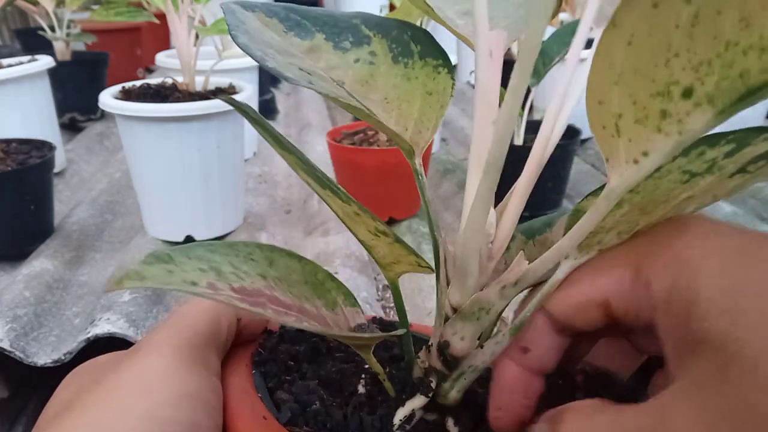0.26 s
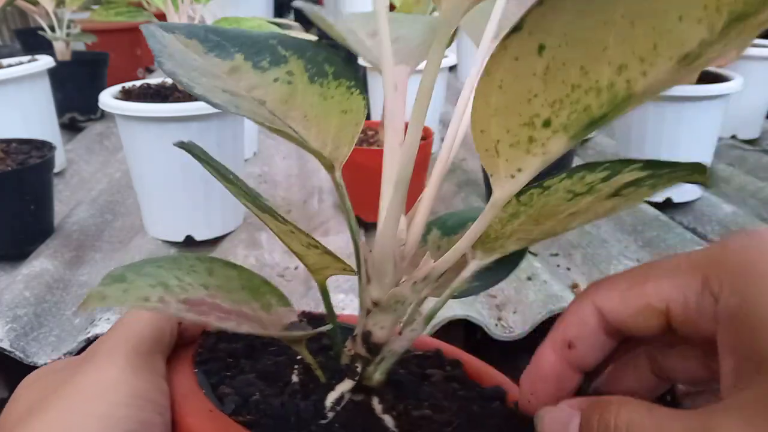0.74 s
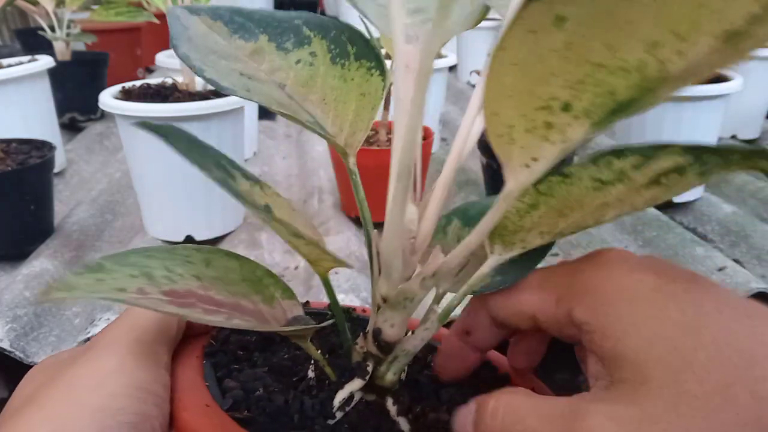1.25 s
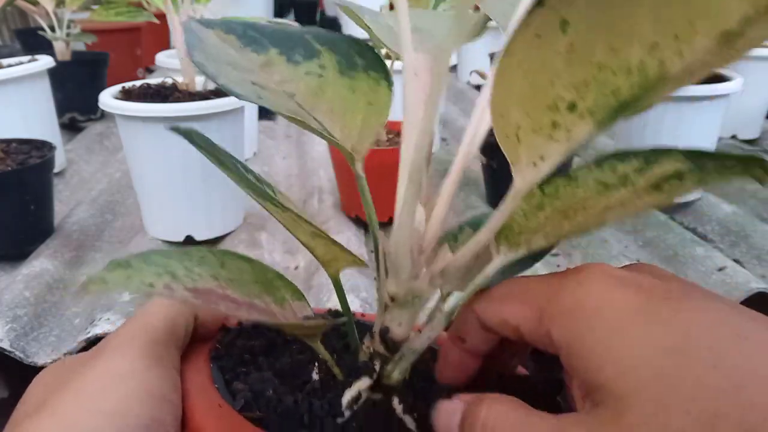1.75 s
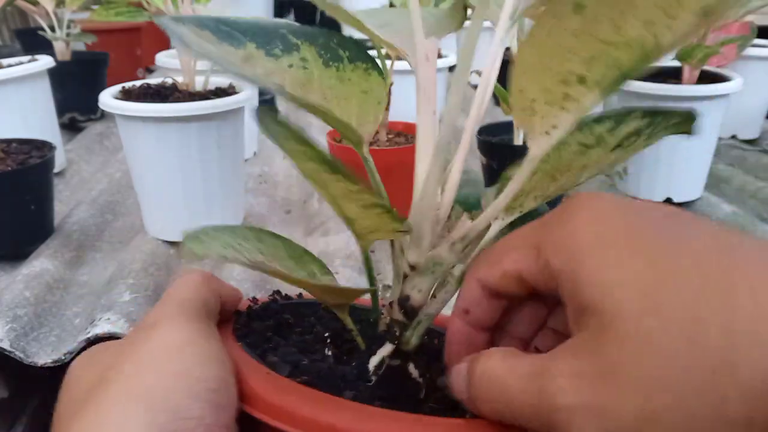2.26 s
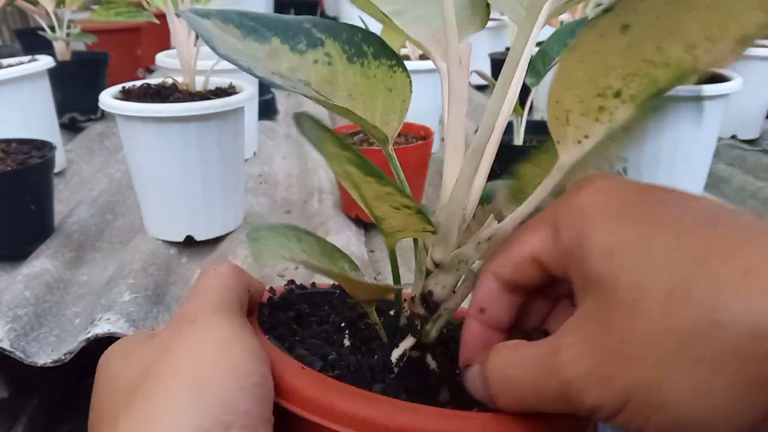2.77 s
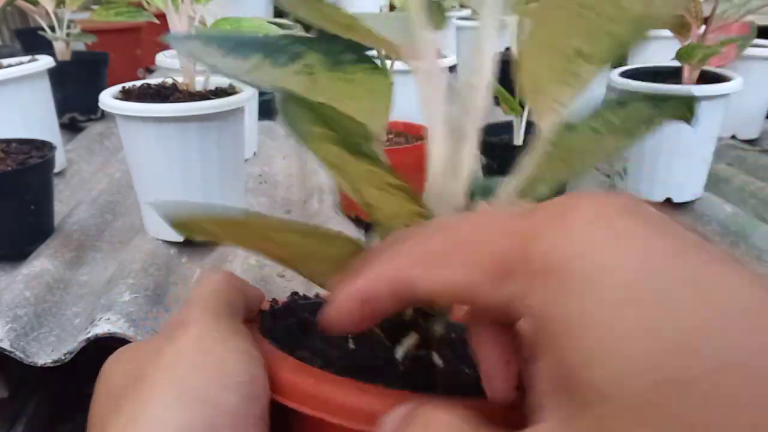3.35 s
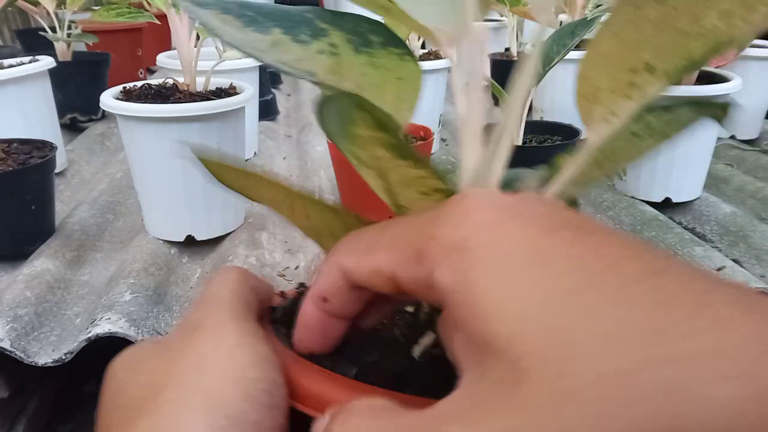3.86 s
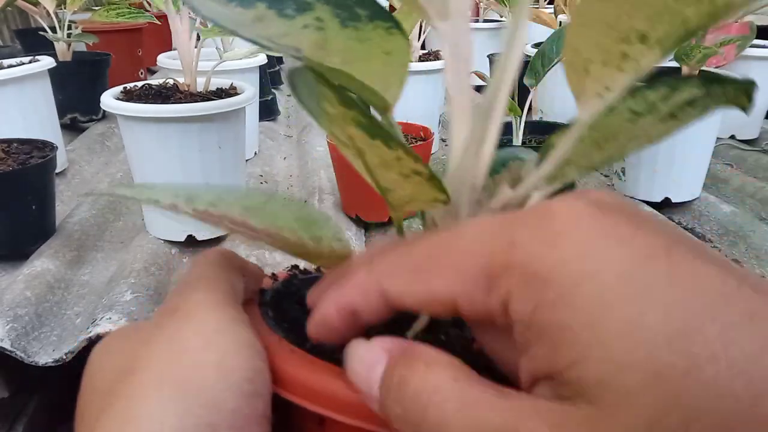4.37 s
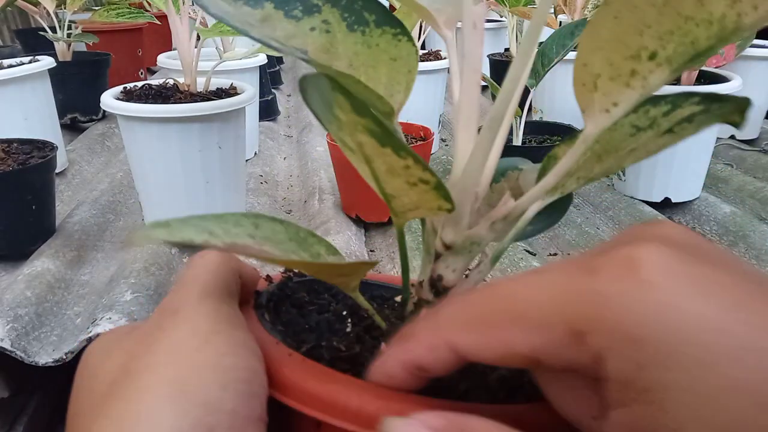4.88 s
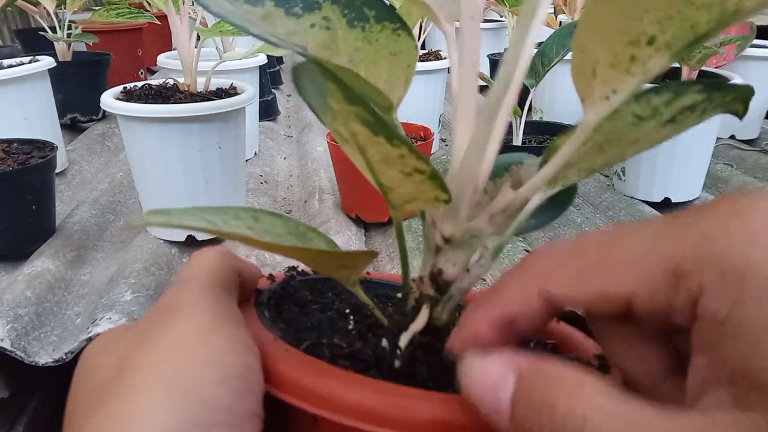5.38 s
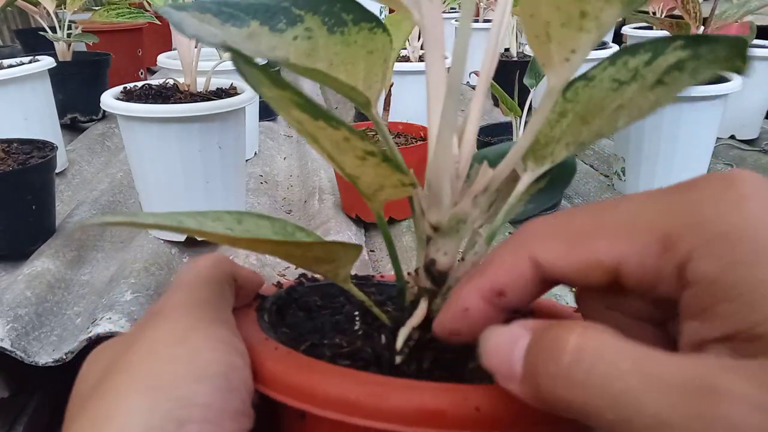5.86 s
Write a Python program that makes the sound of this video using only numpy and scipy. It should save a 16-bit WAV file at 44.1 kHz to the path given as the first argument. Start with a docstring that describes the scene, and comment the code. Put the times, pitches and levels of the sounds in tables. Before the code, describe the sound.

A close outdoor sound of fingers working coarse, gritty soil in a plastic pot. From the start to about 1.4 seconds, uneven pushes crunch and grind, with brittle snaps and slight plastic resonance, strongest in the opening moments and near 1.1 seconds. From 1.4 to 2.1 only soft strokes remain, with a faint bird whistle around 1.8. Digging returns at 2.1, with a hard snap at 2.2 and dense crunching that weakens by 3.6. Light brushing follows around 3.9 to 4.2, while a faint, distant putter and hollow knocks sound between 3.8 and 4.6. From about 4.7 to 6.1 small birds give short rising-and-falling chirps and whistles, slightly blurred by echoes, with faint puttering around 5.2 to 5.7. Tiny snaps come at 5.7 and 6.1. Low, gently swelling yard rumble and thin hiss continue throughout.

```python
"""Fingers dig through coarse, gritty soil in a plastic pot, close by and outdoors: showers of filtered
clicks crunch, and bursts of fractures snap and ring. After a brief lull with soft strokes and a whistle,
the digging resumes, then gives way to brushing over the surface. A faint putter of narrow tone pulses and
hollow modal knocks comes from afar; small birds' gliding sines then chirp, and last come a few faint snaps.
Throughout, shaped noise gives a quiet yard its swelling rumble and thin hiss."""
import sys
import numpy as np
from scipy import signal
from scipy.fft import rfft, irfft
from scipy.io import wavfile
from scipy.ndimage import uniform_filter1d

SR = 44100
rng = np.random.default_rng(int(sys.argv[2]) if len(sys.argv) > 2 else 0)


def store_pcm(level_fs):
    """Save levels as 16-bit WAV."""
    pcm = np.round(np.clip(level_fs, -1, 1) * 32767).astype(np.int16)
    wavfile.write(sys.argv[1], SR, np.atleast_2d(pcm).T)


N = 269892
TIME = np.arange(N) / SR


def amp(db):
    """Level: decibels to amplitude gain."""
    return 10 ** (np.asarray(db) / 20)


def rms(x):
    """Effective value: root mean square amplitude."""
    return np.sqrt(np.mean(x ** 2) + 1e-24)


def read(points, hz):
    """Spectral interpolation: reads a (frequency, dB) curve on a log-frequency axis."""
    f, value = np.transpose(points)
    return np.interp(np.log(hz + 1), np.log(f), value)


def add(mix, start_s, sound):
    """Superposition: adds a sound into the mix at its start time."""
    part = mix[max(round(start_s * SR), 0):][:len(sound)]
    part += sound[:len(part)]


def band(x, lo_hz, hi_hz, order=3):
    """Causal band-pass filtering."""
    sos = signal.butter(order, [lo_hz, min(hi_hz, SR / 2 - 1)], "band", fs=SR, output="sos")
    return signal.sosfilt(sos, x)


def registers(x):
    """Band splitting: divides a sound into thud, body and edge."""
    return band(x, 200, 900), band(x, 900, 4500), band(x, 4500, 17000)


def evened(x, size):
    """Automatic gain: divides a sound by its running rms over size samples."""
    return x / np.sqrt(abs(uniform_filter1d(x ** 2, size=size)) + 1e-12)


def bump(hz, centre_hz, width_hz):
    """Resonance: a bell-shaped response of height 1."""
    return 1 / (1 + (2 * (hz - centre_hz) / width_hz) ** 2)


# modes of the plastic pot: pitch_hz [Hz], width_hz [Hz], lift_db [dB over the soil at full pot share]
POT_MODES = [(680, 70, -2), (1085, 110, 9), (1586, 350, 7), (2085, 71, 6)]


def grain(spectrum, ring_hz, ring_db, width_hz, pot_share, size=2048):
    """Minimum-phase impulse response: a click through soil and pot, with its own ring and a sharp attack."""
    hz = abs(np.fft.fftfreq(size, 1 / SR))
    db = read(spectrum, hz) + ring_db * bump(hz, ring_hz, width_hz)
    db = db + pot_share * sum(lift_db * bump(hz, f, width) for f, width, lift_db in POT_MODES)
    # the Hilbert transform of the log magnitude gives the causal phase
    response = np.exp(np.conj(signal.hilbert(np.log(amp(db)))))
    return np.fft.ifft(response).real[:size // 2]


def grit(spectrum, per_s, spread_db, ring_db, pot_share, count=18):
    """Granular superposition: a random shower of grains of many sizes and pitches, evened in level."""
    out = np.zeros(N)
    for ring_hz in np.geomspace(800, 12000, count):
        clicks = np.zeros(N)
        at = np.flatnonzero(rng.random(N) < per_s / count / SR)
        sizes_db = spread_db * np.minimum(rng.exponential(1, len(at)), 3.5)
        clicks[at] = rng.choice([-1, 1], len(at)) * amp(sizes_db)
        # a grain stutters for about a millisecond as it slips
        slip = rng.standard_normal(256) * np.exp(-np.arange(256) / SR / .001)
        sound = np.convolve(slip, grain(spectrum, ring_hz, ring_db, ring_hz / 3, pot_share))
        out += signal.oaconvolve(clicks, sound)[:N]
    # only the body sets the evening gain
    return out / np.sqrt(abs(uniform_filter1d(band(out, 900, 4500) ** 2, size=1500)) + 1e-12)


# firm pushes into the soil; the three levels are before the trims in crunch():
# start_s [s, full level reached], held_s [s], level_db [dB], fizz_db, thud_db [dB against level]
DIGS = [(0.0, .003, -36, -0.5, -8), (0.05, .07, -41.5, -3, -2), (0.17, 0.059, -49.5, -2.5, 0),
        (0.295, .13, -41, -2, -4), (0.45, 0.14, -44, -5, -6), (0.606, .13, -34.5, -4, -6),
        (0.76, 0.1093, -34, -4, -1.5), (0.919, 0.1, -41.5, -4, -2.5), (1.055, 0.061, -30.5, -6, -0.5),
        (1.157, 0.021, -38, -2, -1), (1.265, .02, -42.5, -4, -3), (1.371, .025, -47, -8, -4),
        (2.114, .012, -47.5, -4.5, -5.5), (2.209, 0.026, -37, -8.5, 3.5), (2.3, 0.078, -36.5, -4, 2),
        (2.45, 0.15, -39, -5.5, -1), (2.64, 0.036, -46.5, -2.5, 2), (2.748, 0.014, -41.5, -3, 0),
        (2.803, 0.18, -45.5, -6, 3), (3.008, 0.035, -42, -6, -2), (3.143, 0.032, -53.5, -6, -2),
        (3.203, .06, -48.5, -8, -4), (3.275, .025, -40, -7.5, -4), (3.393, .015, -34, -6.5, -1.5),
        (3.48, .015, -53.5, -2, -2), (3.568, 0.015, -48, -4.5, -4)]
# light strokes over the surface, same levels:
# middle_s [s], fade_s [s to fade 10 dB either side], level_db [dB], fizz_db, thud_db [dB against level]
BRUSHES = [(1.68, 0.06, -48, -15, -5), (1.81, .08, -57, -10, 0), (1.965, 0.075, -42.5, -13.5, -3),
           (3.63, 0.16, -65, -9, -1), (3.937, 0.0872, -42.5, -17, 2), (4.103, 0.0471, -43, -13, -2),
           (4.24, 0.2, -61.5, -13, 5.5), (4.58, .025, -59, -10.5, -2), (5.085, .04, -50.5, -14.5, -2.5),
           (5.43, .12, -64, -11, 2), (5.69, 0.1, -61, -7, -2)]


def effort(attack_s=.007, release_db_per_s=195, resting_db=-73.5, resting_fizz_db=-11):
    """Power summation: crunch level, fizz and thud against it (dB), and the power share of firm pushes."""
    # a resting hand still stirs a few crumbs
    strokes = [(amp(resting_db) * np.ones(N), resting_fizz_db, 0)]
    for middle_s, fade_s, db, fizz_db, thud_db in BRUSHES:
        fade_db = 10 * np.minimum(abs(TIME - middle_s) / fade_s, 10)
        strokes.append((amp(db - fade_db), fizz_db, thud_db))
    light = sum(level ** 2 for level, _, _ in strokes)
    # under a push the grit gives way quickly and settles slowly
    for start_s, held_s, db, fizz_db, thud_db in DIGS:
        attack = np.clip(1 + (TIME - start_s) / attack_s, 0, 1)
        release_db = release_db_per_s * np.clip(TIME - start_s - held_s, 0, 1)
        strokes.append((attack * amp(db - release_db), fizz_db, thud_db))
    power = sum(level ** 2 for level, _, _ in strokes)
    fizz = sum((level * amp(fizz_db)) ** 2 for level, fizz_db, _ in strokes)
    thud = sum((level * amp(thud_db)) ** 2 for level, _, thud_db in strokes)
    return 10 * np.log10([power, fizz / power, thud / power]), 1 - light / power


# a coarse grain heard through the soil: pitch_hz [Hz], level_db [dB]
SOIL = [(100, -26), (250, -19.5), (450, -13), (700, -2.5), (1300, -5), (2500, -1), (3500, -2),
        (4800, -13.5), (6600, -19), (8500, -11), (10500, -22.5), (12500, -26.5), (15300, -23), (16200, -40)]
# fine crumbs under a soft fingertip: pitch_hz [Hz], level_db [dB]
CRUMBS = [(100, -21), (350, -4), (560, -6.5), (850, -1), (1250, -6), (1800, -1.5), (3100, 0), (4600, -10.5),
          (6500, -21), (8400, -13), (11000, -22.5), (16000, -30.5)]


def crunch(crunch_db=-1.5, fizz_db=-2.0, low_db=0, coarse_share=0.58):
    """Granular friction: light touch brushes fine crumbs, firm pushes grind coarse grit against the pot."""
    (level_db, fizz, low), pushing = effort()
    firm = np.clip(coarse_share * pushing, 0, 1)
    coarse = grit(SOIL, per_s=330, spread_db=4.0, ring_db=12.5, pot_share=0.49)
    fine = grit(CRUMBS, per_s=2200, spread_db=4.0, ring_db=8, pot_share=0.13)
    thud, body, edge = registers(np.sqrt(firm) * coarse + np.sqrt(1 - firm) * fine)
    # the fizz of the finest grains follows its own level
    edge = evened(edge, 5000)
    mixed = amp(low + low_db) * thud + body + amp(fizz + fizz_db) * edge
    return amp(level_db + crunch_db) * mixed


def small_lumps(count=10, per_s=20, lump_db=1.5, spread_db=2, low_hz=1050, high_hz=3600,
                lump_thud_db=-8, lump_edge_db=-5):
    """Random fracture: lesser snaps scattered through each push, following its level, fizz and thud."""
    rows = []
    for start_s, held_s, db, fizz_db, thud_db in DIGS:
        places = rng.random((count, 2))
        colours = spread_db * (2 * rng.random((count, 3)) - 1)
        for k, ((when, pitch), (strength, thud, edge)) in enumerate(zip(places, colours)):
            after_s = (k + when) / per_s
            if after_s < held_s:
                rows.append((start_s + after_s, db + lump_db + strength,
                             thud_db + lump_thud_db + 2 * thud,
                             fizz_db + lump_edge_db + 2 * edge,
                             low_hz * (high_hz / low_hz) ** pitch))
    return rows


# larger lumps of grit snapping: start_s [s], level_db [dB, rms of the body over the first 8 ms],
# thud_db, edge_db [dB against level, before the trims in snaps()], pitch_hz [Hz, own ring]
SNAPS = [(0.0301, -20.5, -7.5, -13, 1473), (0.044, -32, -11, -8.5, 1440), (0.0816, -17.5, -23.5, -10, 1528),
         (0.1588, -33.5, -5.5, -0.5, 2060), (0.191, -39, -3.5, -23, 1093), (0.2406, -35.5, -8.5, -18, 2270),
         (0.2564, -30, -7.5, -21.5, 1080), (0.2847, -19, -33.5, -16.5, 1554), (0.333, -33, -25, -26, 1640),
         (0.3604, -28, -21.5, -11, 1530), (0.5735, -37, -30, 5, 3800), (0.605, -30.5, -25.5, -2, 2970),
         (0.6146, -25, -19, -13, 2960), (0.6371, -24, -23.5, -3, 3740), (0.7085, -21.5, -4, -12, 1645),
         (0.7645, -26.5, -6.5, -9, 3452), (0.807, -30, -8, -4.5, 3910), (0.8755, -33, 4.5, -31, 980),
         (0.9474, -25, -10, -20, 1080), (0.9939, -28.5, -7, -9.5, 2300), (1.0314, -26, -9, -17, 1120),
         (1.0643, -24, -6, -19, 2498), (1.0869, -27.5, -1, -13, 1300), (1.1079, -28.5, -8, -12, 3210),
         (1.156, -24, -1.5, -7.5, 996), (1.209, -27, -5, -4, 2110), (1.2605, -24, -14.5, -18, 1150),
         (1.372, -40.5, -10, -12, 2590), (2.1121, -32, -15.5, -6.5, 1205), (2.208, -16, -3, -19.5, 2135),
         (2.2906, -28.5, -19, -5.5, 2130), (2.3271, -23.5, -9.5, -11, 2380), (2.341, -24.5, -5, -11, 2140),
         (2.3627, -22.5, -14.5, -13.5, 2210), (2.4437, -22.5, -10.5, -12, 2170), (2.46, -32, -9, -4, 2600),
         (2.472, -30, -4, -14, 2250), (2.4956, -31, -8, -4, 3342), (2.532, -30, -3.5, -14, 1030),
         (2.5715, -31.5, -15, -1, 1226), (2.6683, -31.5, -14, -8.5, 3510),
         (2.7522, -33.5, -9.5, -6.5, 3595), (2.804, -40.5, -0.5, -7.5, 1100), (2.817, -36, -12, -9.5, 2230),
         (2.863, -35.5, -22, -8, 1483), (2.9522, -33, -9.5, -8.5, 3630), (3.0146, -29.5, -25.5, 0.5, 2740),
         (3.0565, -33, -11, -4, 3270), (3.143, -41.5, -11.5, -7.5, 2580), (3.2042, -35, -22, -22, 2236),
         (3.222, -36, -15, -17, 1065), (3.2649, -28, -7.5, -21, 1065), (3.2999, -32.5, -13, -9.5, 1080),
         (3.3797, -35, -27, -4.5, 3660), (3.3957, -33.5, -14, -0.5, 3430), (3.495, -41, -31, -6, 2120),
         (3.5674, -36.5, -40, -7.5, 3100), (5.689, -60, 1, 7.5, 3000), (5.786, -55.5, -6, -7, 3390),
         (6.106, -54.5, 3, -5.5, 1047)]


def snaps(break_s=0.002, swell_s=.0005, crumble_s=.012, crumble_db=-20, first=1.95,
          ring_db=9, ring_q=4.5, thud_db=-1, body_db=0, edge_db=2.0, size=2600):
    """Brittle fracture: a lump gives way in a milliseconds-long burst of tiny fractures, then crumbles."""
    out, t = np.zeros(N), np.arange(size) / SR
    head = t < .008
    decay = np.exp(-t / break_s) + amp(crumble_db) * np.exp(-t / crumble_s)
    burst = (1 - np.exp(-t / swell_s)) * decay
    for start_s, db, thud, edge, ring_hz in SNAPS + small_lumps():
        chance, strength = rng.random(size), rng.standard_normal(size)
        fractures = strength * (chance < .35) * burst
        fractures[0] += first
        response = grain(SOIL, ring_hz, ring_db, width_hz=ring_hz / ring_q, pot_share=0.86)
        sound = signal.fftconvolve(fractures, response)[:size]
        for part, part_db in zip(registers(sound), (thud + thud_db, body_db, edge + edge_db)):
            add(out, start_s, amp(db + part_db) * part / rms(part[head]))
    return out


def echoes(x, t60, dull_hz, delay_s):
    """Diffuse reflection: sparse decaying echoes from pots, roofing and walls, unit energy before dulling."""
    t = np.arange(SR // 2) / SR
    sparse = rng.standard_normal(len(t)) * (rng.random(len(t)) < .1)
    taps = sparse * amp(-60 * t / t60) * (t > delay_s)
    dulling = signal.butter(1, min(dull_hz, SR / 2 - 1), fs=SR, output="sos")
    taps = signal.sosfilt(dulling, taps / np.linalg.norm(taps))
    return signal.fftconvolve(x, taps)[:N]


# arched chirps, nominal top before the lift in birds():
# start_s [s], length_s [s], top_hz [Hz], level_db [dB rms before the mix in birds()]
CHIRPS = [(4.796, .1, 2785, -58), (4.939, .078, 2810, -55.5), (5.151, 0.079, 2640, -52.5),
          (5.391, .09, 2830, -53.5), (5.637, .08, 2860, -54.5), (5.883, .099, 2840, -53.5)]
# plain whistles around the chirps, the last high ones from a second bird; nominal pitches:
# start_s [s], length_s [s], start_hz [Hz], close_hz [Hz], level_db [dB rms before the mix in birds()]
WHISTLES = [(1.83, 0.16, 2640, 2454, -60), (4.28, 0.0902, 2600, 2330, -68.5),
            (4.653, 0.038, 2270, 2336, -69.5), (4.731, .08, 2223, 1920, -65),
            (5.073, 0.0495, 2377, 2330, -63), (5.346, 0.059, 2315, 2290, -57),
            (5.568, 0.08, 2266, 2350, -54.5), (5.812, 0.0423, 2340, 2360, -64.5),
            (5.825, 0.078, 3170, 3600, -73), (5.903, 0.107, 3910, 3680, -66),
            (6.061, .075, 3670, 3450, -61.5)]


def bird_notes(chirp_start_hz=2240, chirp_close_hz=2153, settled=.75):
    """Pitch contours: chirps arch; whistles cover the settled share of their glide by the middle point.

    Rows: start_s, length_s, start_hz, middle_hz, close_hz, level_db."""
    arches = [(start_s, length_s, chirp_start_hz, top_hz, chirp_close_hz, db)
              for start_s, length_s, top_hz, db in CHIRPS]
    glides = [(start_s, length_s, a_hz, a_hz + settled * (b_hz - a_hz), b_hz, db)
              for start_s, length_s, a_hz, b_hz, db in WHISTLES]
    return arches + glides


def birds(waver=0.02, apex=0.48, lift_hz=70, overtone_db=-44, octave_db=27,
          direct_db=-1.3, echo_db=-2.0, fade_db=-4):
    """Frequency modulation: slightly rough gliding sines, blurred by reflections from the yard's walls."""
    out = np.zeros(N)
    for start_s, length_s, start_hz, middle_hz, close_hz, db in bird_notes():
        u = np.linspace(0, 1, round(length_s * SR))
        flutter = uniform_filter1d(rng.standard_normal(len(u)), size=90)
        tune = np.interp(u, [0, apex, 1], [start_hz, middle_hz, close_hz])
        tune = uniform_filter1d(tune, size=600, mode="nearest")
        # wide sweeps are rougher and lifted higher; level notes stay pure
        sweep = np.ptp(tune) / 500
        tune = tune + lift_hz * sweep * np.sin(np.pi * u) ** 2
        wavering = tune * (1 + waver * sweep * flutter / rms(flutter))
        phase = 2 * np.pi * np.cumsum(wavering) / SR
        # the octave is strongest where the pitch nears 2930 Hz
        octave = amp(overtone_db + octave_db * bump(tune, 2930, 280))
        envelope = np.sqrt(u * (1 - u)) * amp(fade_db * u ** 2)
        note = (np.sin(phase) + octave * np.sin(2 * phase)) * envelope
        add(out, start_s, amp(db) * note / rms(note))
    blur = echoes(out, t60=0.21, dull_hz=7080, delay_s=0.017)
    return amp(direct_db) * out + amp(echo_db) * blur


# runs of a faint, distant putter:
# start_s [s], length_s [s], gap_s [s between pulses], level_db [dB before spread and trim]
PUTTER_RUNS = [(3.972, .39, .0595, -51.5), (5.157, .54, .0635, -61)]
# light hollow knocks: start_s [s], level_db [dB before the trim in putter()]
KNOCKS = [(3.766, -52), (4.419, -49), (4.553, -57), (5.35, -55.5)]


def putts(uneven_db=1.5, with_knock_db=-2):
    """Periodic excitation: (start_s, level_db) of evenly spaced pulses, and of one with every knock."""
    runs = [(start_s + after_s, db + uneven_db * rng.uniform(-1, 1))
            for start_s, length_s, gap_s, db in PUTTER_RUNS
            for after_s in np.arange(0, length_s, gap_s)]
    return runs + [(start_s, db + with_knock_db) for start_s, db in KNOCKS]


# modes of a knock: pitch_hz [Hz], level_db [dB], t60_s [s to decay 60 dB]
KNOCK_MODES = [(907, -0.5, 0.22), (1176, -4.5, 0.162)]


def putter(pulse_hz=606, pulse_s=0.046, putt_db=-1.5, rasp_db=-6.0, knock_db=-1.0, echo_db=-13):
    """Pulsed tones and modal decay: soft pulses about sixteen a second and hollow knocks, with echoes."""
    out, t = np.zeros(N), np.arange(round(pulse_s * SR)) / SR
    for start_s, db in putts():
        rasp = band(rng.standard_normal(len(t)), 400, 1840, order=4)
        tone = np.sin(2 * np.pi * pulse_hz * rng.uniform(0.94, 1.015) * t)
        pulse = tone + amp(rasp_db) * rasp / rms(rasp)
        add(out, start_s, amp(db + putt_db) * pulse * np.sin(np.pi * t / pulse_s))
    t = np.arange(SR // 4) / SR
    modes = sum(amp(db - 60 * t / t60_s) * np.sin(2 * np.pi * hz * t) for hz, db, t60_s in KNOCK_MODES)
    ring = modes * (1 - np.exp(-t / 0.0018))
    for start_s, db in KNOCKS:
        add(out, start_s, amp(db + knock_db) * ring)
    return out + amp(echo_db) * echoes(out, t60=0.3, dull_hz=4020, delay_s=.012)


# spectral shape of the yard's steady background: pitch_hz [Hz], level_db [relative dB per Hz]
YARD = [(22, -34.5), (50, -9), (95, 3.5), (130, 3.5), (210, -6.5), (500, -10.5), (900, -17), (1700, -19.5),
        (3100, -23), (5000, -41), (6900, -37.5), (7700, -28), (8700, -33.5), (9900, -45), (16000, -51.5)]


def yard(level_db=-62, swell_db=-0.94):
    """Spectrally shaped noise: low outdoor rumble that swells unevenly, with a thin hiss on top."""
    shape = amp(read(YARD, np.fft.rfftfreq(N, 1 / SR)))
    air = irfft(rfft(rng.standard_normal(N)) * shape, N)
    rumble = signal.sosfiltfilt(signal.butter(2, 250, fs=SR, output="sos"), air)
    moments = np.arange(0, 7, .13)
    swell = amp(swell_db * np.interp(TIME, moments, rng.standard_normal(len(moments))))
    return amp(level_db) * (air + (swell - 1) * rumble) / rms(air)


def scene(echo_db=-14):
    """Linear superposition: the pot close by with its early echoes, the yard behind it."""
    soil = snaps() + crunch()
    near_echoes = amp(echo_db) * echoes(soil, t60=0.16, dull_hz=4500, delay_s=0.004)
    return (soil + near_echoes + birds() + putter() + yard())[None]


def record(dry, edge_hz=16000):
    """Band limiting: a linear-phase low-pass removes the highest treble."""
    lowpass = signal.firwin(255, edge_hz, window=("kaiser", 9), fs=SR)
    return signal.oaconvolve(dry, lowpass[None], "same")


dry = scene()
out = record(dry)
store_pcm(out)
```